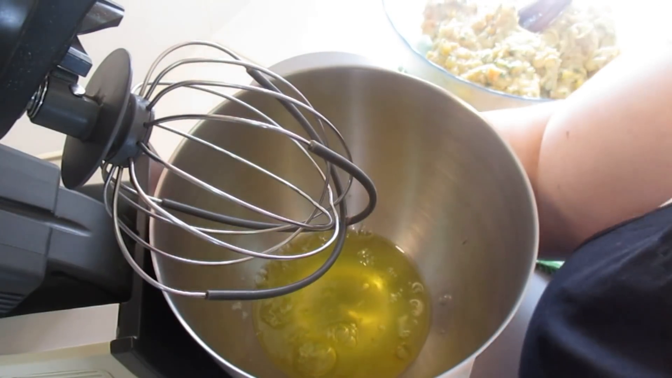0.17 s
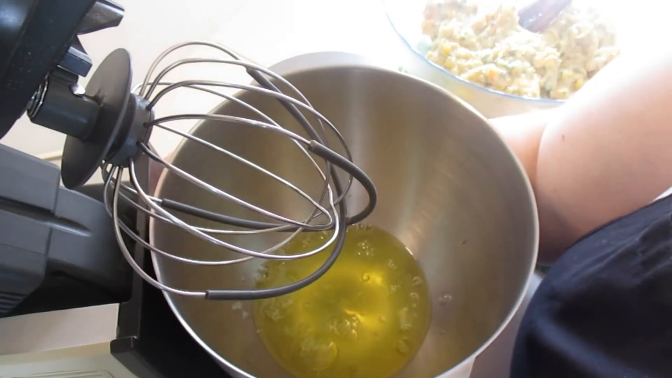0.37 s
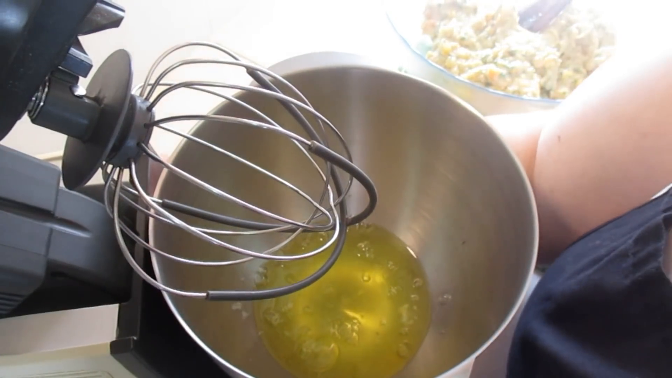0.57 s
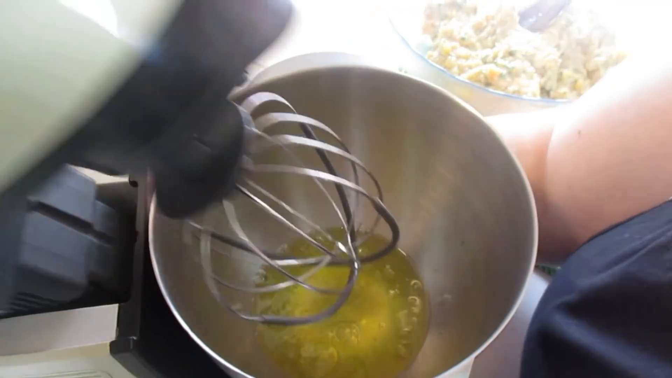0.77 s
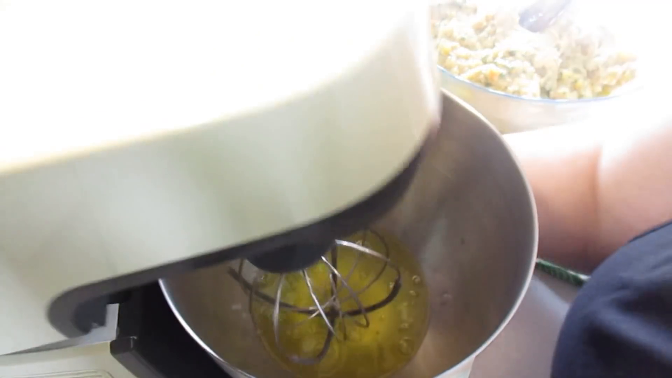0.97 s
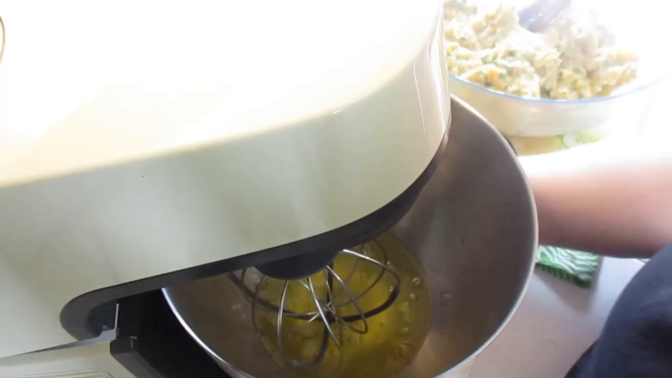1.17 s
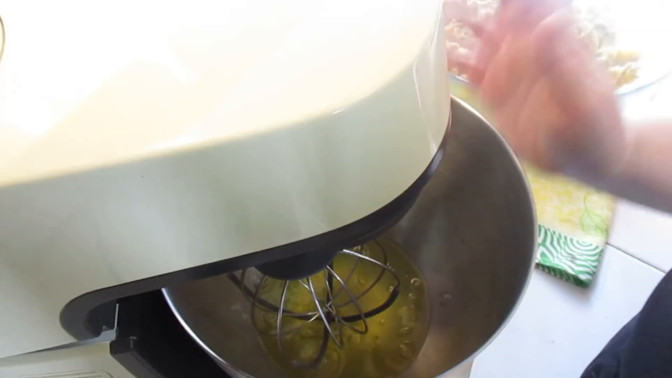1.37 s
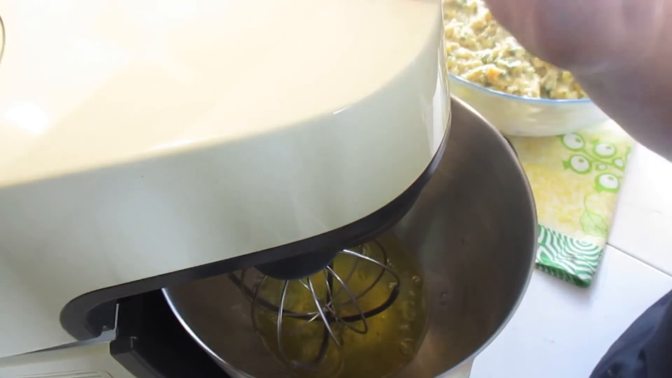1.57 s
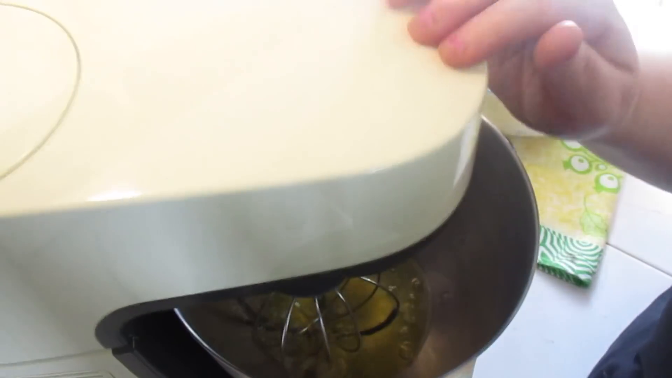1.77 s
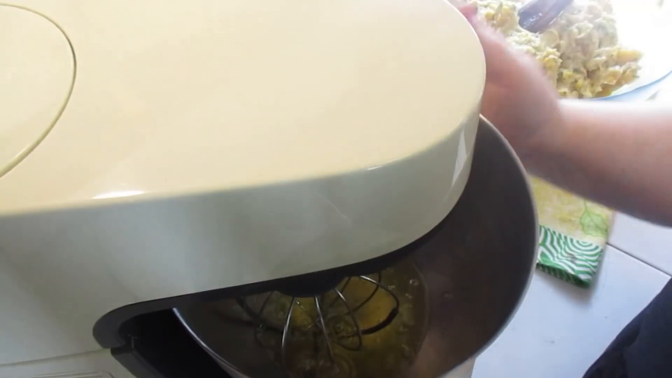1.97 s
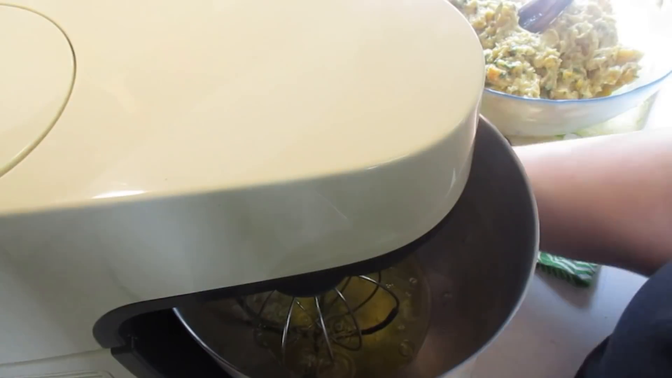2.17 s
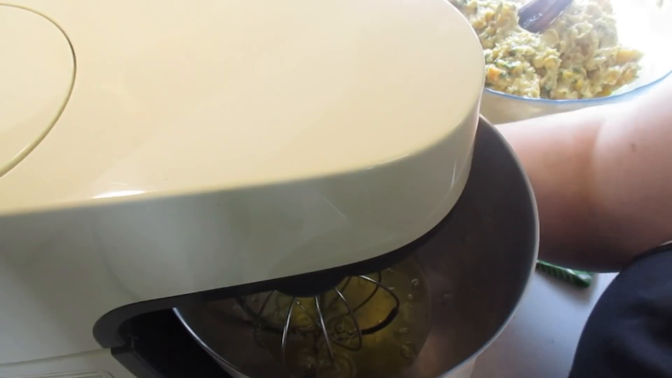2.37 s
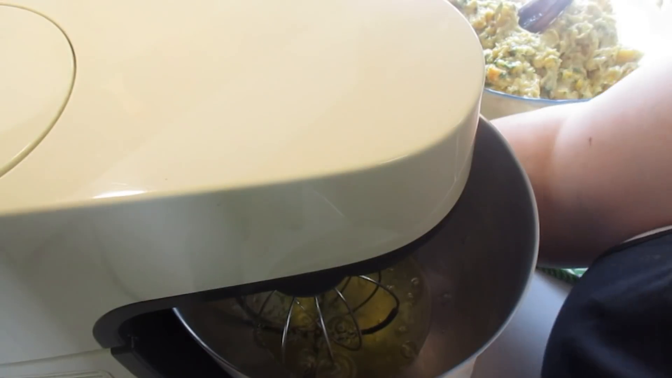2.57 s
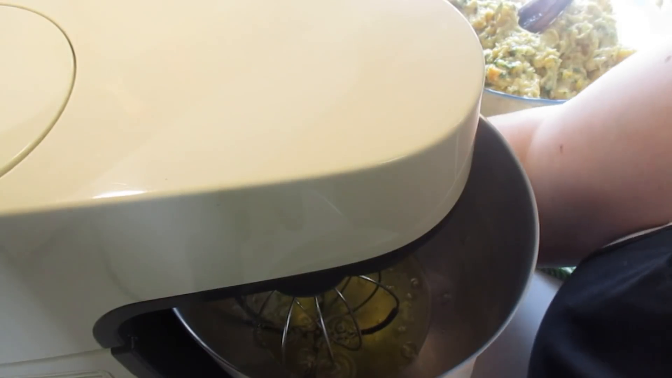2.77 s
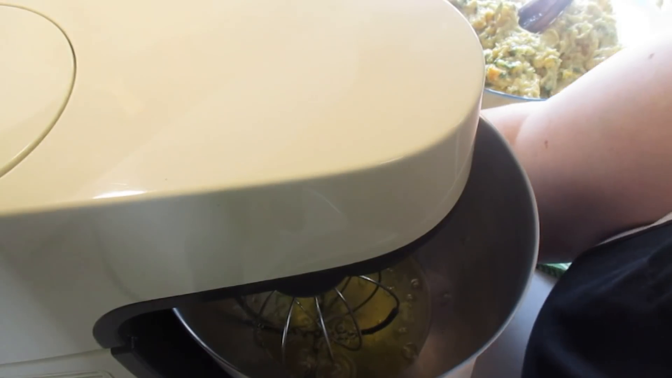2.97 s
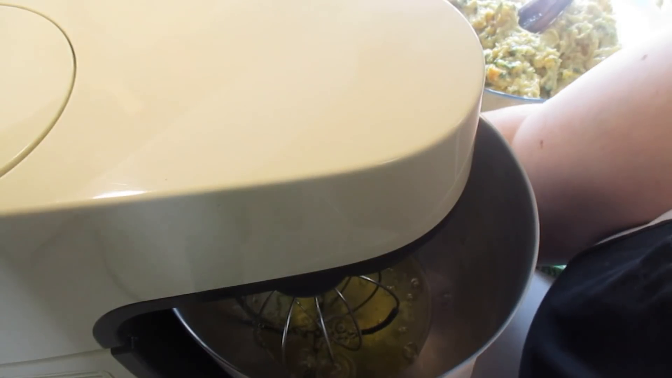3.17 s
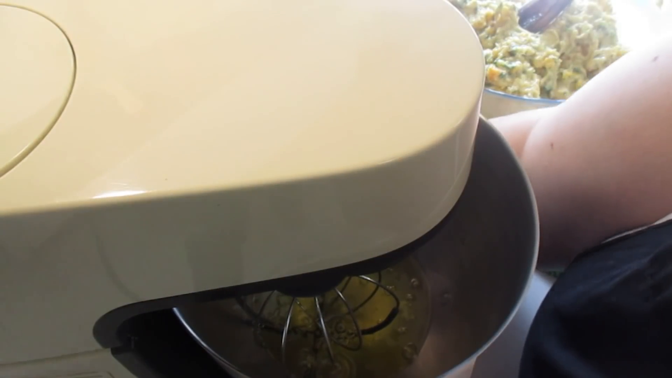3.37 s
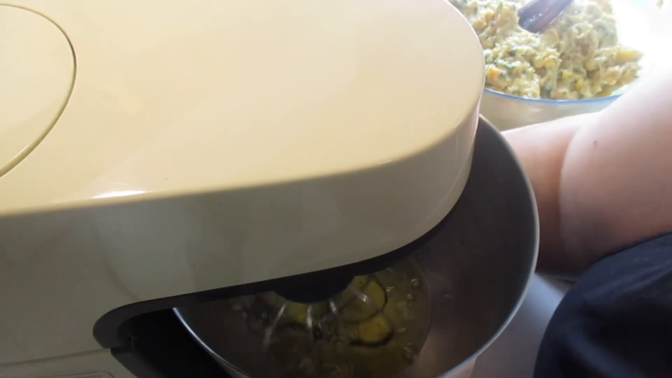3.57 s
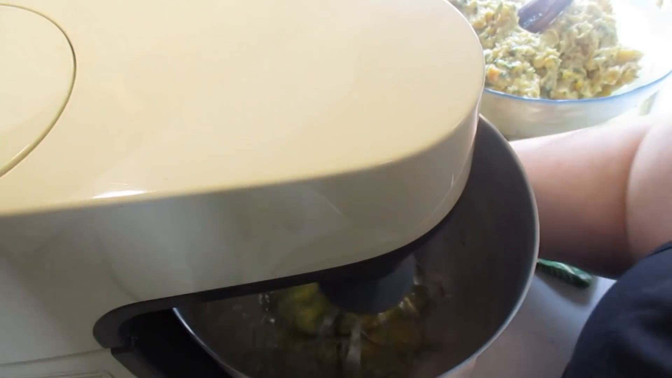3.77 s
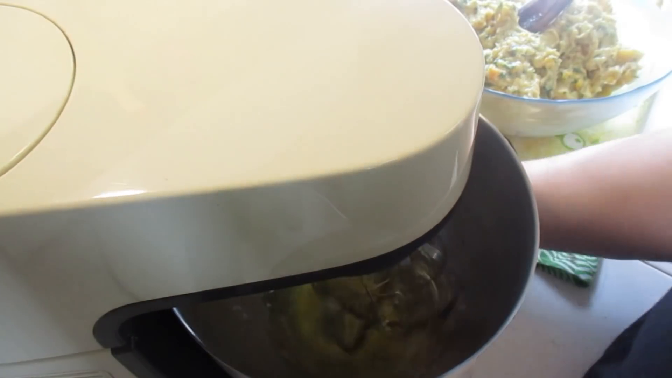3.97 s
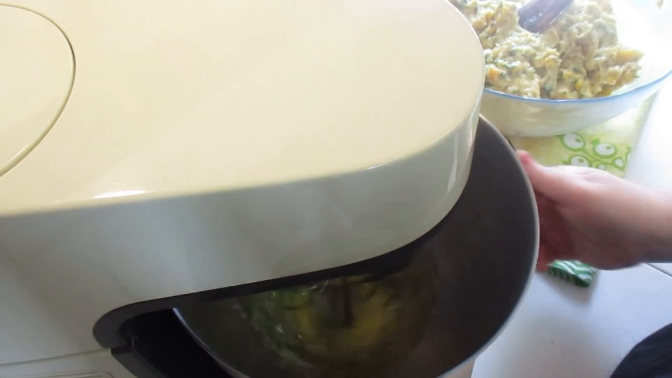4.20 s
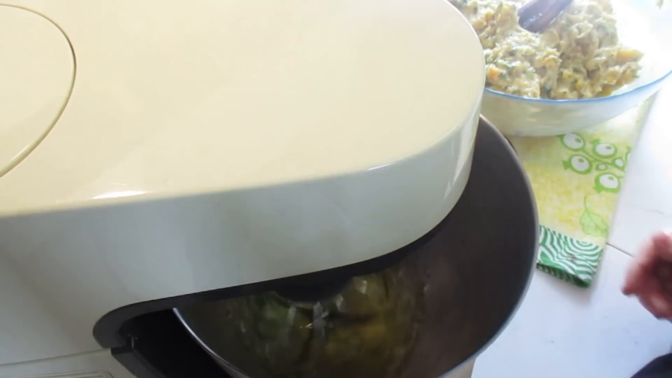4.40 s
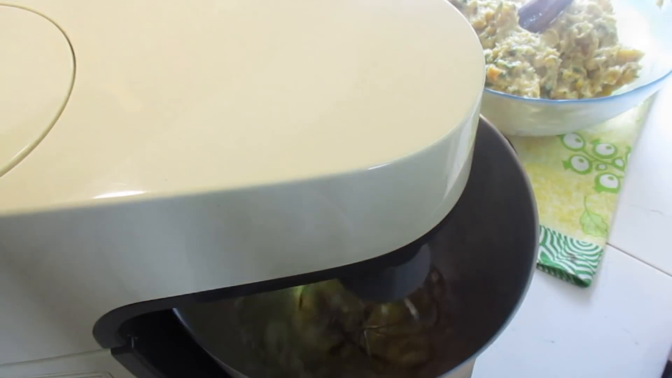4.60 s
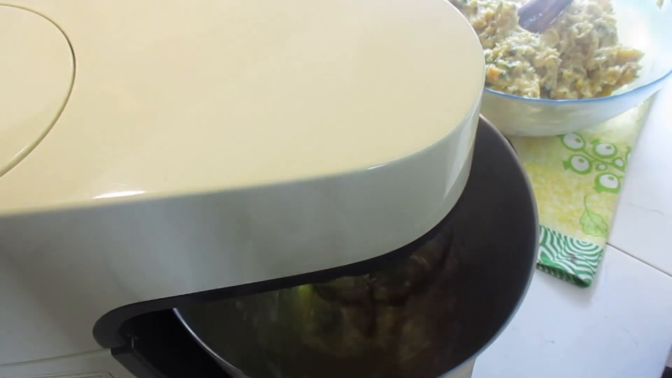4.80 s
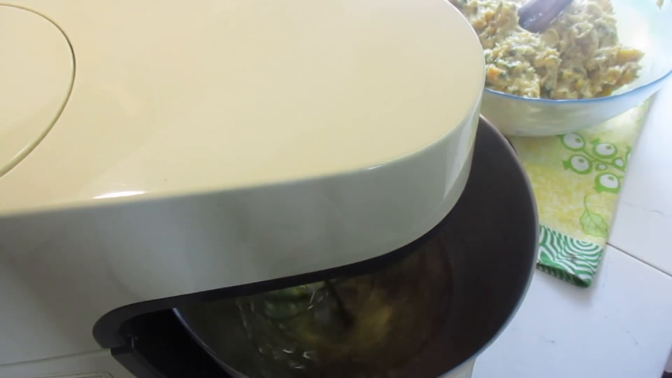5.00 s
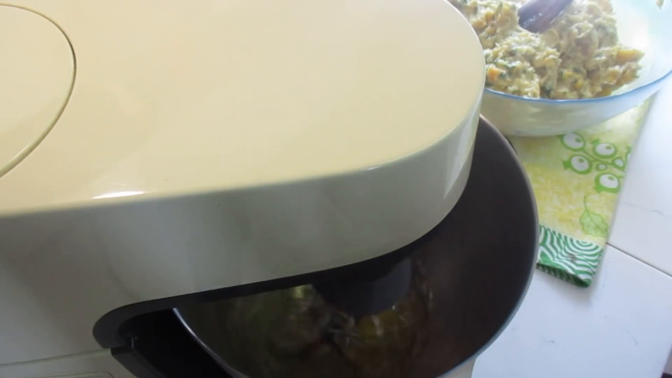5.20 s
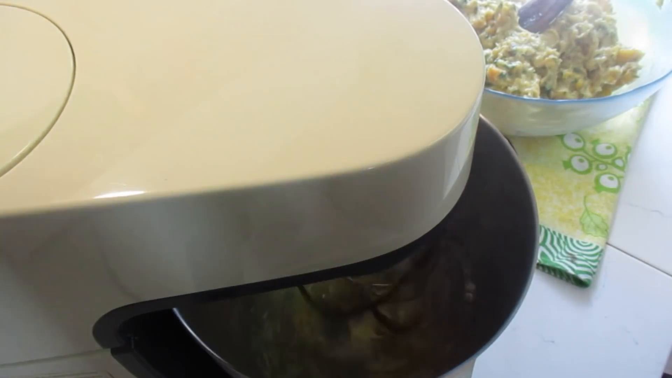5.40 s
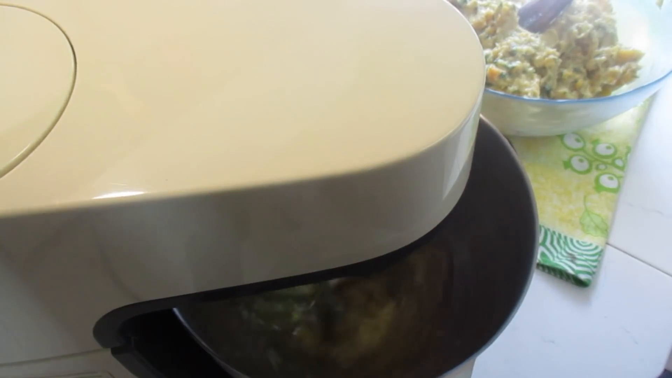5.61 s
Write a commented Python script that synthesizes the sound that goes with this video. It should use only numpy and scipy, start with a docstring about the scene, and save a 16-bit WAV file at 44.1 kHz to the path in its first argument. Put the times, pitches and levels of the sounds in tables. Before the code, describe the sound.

Plastic and metal knocks as a mixer head swings down and locks with a loud clack, then the motor starts and whirs steadily, speeding up.

```python
"""A stand mixer runs close by in a kitchen: gears clatter, the shaft whines, a wire whisk beats eggs in a steel bowl.
Shaft orders, brush buzz and random impacts sound through resonances; the motor speeds up in two steps.
Before that the unlatched head swings down, is pressed home and the speed knob clicks: noise bursts ring the housing.
Room air and faint appliance tones lie behind. Overload ducks the gain, hardest at the loudest clack."""
import sys
import numpy as np
from scipy import signal
from scipy.fft import rfft, irfft, next_fast_len
from scipy.io import wavfile
from scipy.ndimage import uniform_filter1d, minimum_filter1d, map_coordinates

SR = 44100
rng = np.random.default_rng(int(sys.argv[2]) if len(sys.argv) > 2 else 0)


def store_pcm(level_fs):
    """Save levels as 16-bit WAV."""
    pcm = np.round(np.clip(level_fs, -1, 1) * 32767).astype(np.int16)
    wavfile.write(sys.argv[1], SR, np.atleast_2d(pcm).T)


N = 249165
TOP_HZ = 15950  # upper band limit


def amp(db):
    """Decibels to gain."""
    return 10 ** (np.asarray(db) / 20)


def unit(x):
    """x at rms 1."""
    return x / np.sqrt(np.mean(x ** 2) + 1e-20)


def steady(x, span_s):
    """x at an even rms of 1 over each span_s; its fast grain stays."""
    power = np.abs(uniform_filter1d(x ** 2, size=int(span_s * SR) + 1))
    return x / np.sqrt(power + 1e-12)


def along(points, hz):
    """(f/Hz, value) points read on a log axis."""
    f, v = np.transpose(points)
    return np.interp(np.log(hz + 1), np.log(f + 1), v)


def curve(rows):
    """(t/s, value) rows as one value per sample."""
    s, v = np.transpose(rows)
    return np.interp(np.arange(N) / SR, s, v)


def during(start_s, end_s, fade_s):
    """1 from start to end, fading to 0 outside."""
    t = np.arange(N) / SR
    return np.clip(1 + np.minimum(t - start_s, end_s - t) / fade_s, 0, 1)


def settling(start_s, lag_s):
    """0 until start, then approaching 1 with time constant lag_s."""
    return 1 - np.exp(-np.maximum(np.arange(N) / SR - start_s, 0) / lag_s)


def wobble(knots_per_s):
    """Smooth random curve."""
    knots = rng.standard_normal(int(N * knots_per_s / SR) + 4)
    return map_coordinates(knots, [np.arange(N) * knots_per_s / SR])


def coloured(x, gain):
    """x through the causal minimum-phase filter whose gain is the given function of Hz."""
    m = 2 * next_fast_len(len(x) // 2 + 4096)
    log_gain = np.log(np.maximum(gain(np.fft.rfftfreq(m, 1 / SR)), 1e-6))
    cepstrum = irfft(log_gain)
    cepstrum[1:m // 2] *= 2
    cepstrum[m // 2 + 1:] = 0
    return irfft(rfft(x, m) * np.exp(rfft(cepstrum)), m)[:len(x)]


def band(hz, lo_hz, hi_hz, order=4):
    """Gain of a band-pass."""
    low_side = 1 + (lo_hz / (hz + 1)) ** (2 * order)
    high_side = 1 + (hz / hi_hz) ** (2 * order)
    return (low_side * high_side) ** -.5


def resonances(hz, modes):
    """Power gain of a set of (f/Hz, width/Hz, level/dB) resonances."""
    return sum(amp(db) ** 2 / (1 + (2 * (hz - c) / w) ** 2) for c, w, db in modes)


def grains(rate_per_s, spread_db):
    """Tiny impacts of random time and size, at rms 1."""
    hits = rng.random(N) < rate_per_s / SR
    return unit(hits * rng.standard_normal(N) * amp(spread_db * rng.standard_normal(N)))


def churned(x, depth_db):
    """x with ever-changing bands favoured: time-frequency patches of random gain."""
    z = signal.stft(x, nperseg=512)[2]
    field = uniform_filter1d(rng.standard_normal(z.shape), size=5, axis=0)
    field = uniform_filter1d(field, size=9, axis=1)
    return signal.istft(z * amp(depth_db * unit(field)), nperseg=512)[1][:N]


def add(track, s, sound):
    """Mix a sound into the track at s seconds."""
    part = track[max(round(s * SR), 0):][:len(sound)]
    part += sound[:len(part)]


# decay of the kitchen's answer: f/Hz, t60/s
WALL_DECAY = [(100, 0.22), (400, 0.3), (1200, 0.28), (4000, 0.2), (12000, 0.24)]


def room(x, wet_db):
    """x with the kitchen's answer: diffuse noise, each frequency dying at its own speed."""
    hz, t, z = signal.stft(rng.standard_normal(SR // 2), SR, nperseg=256)
    decay = amp(-60 * t / along(WALL_DECAY, hz)[:, None])
    tail = signal.istft(z * decay, SR, nperseg=256)[1]
    tail = np.pad(tail / np.linalg.norm(tail), (SR // 200, 0))  # 5 ms pre-delay
    return x + amp(wet_db) * signal.fftconvolve(x, tail)[:len(x)]


EVEN_S = .09  # span over which drive layers are evened out
START_S, CRUISE_TURNS_PER_S = 3.458, 103.2  # motor start, first setting
# shaft spins up, overshoots, settles, is turned up: t/s, speed/(turns/s)
SHAFT_SPEED = [(3.458, 0), (3.51, 44), (3.58, 71), (3.65, 89), (3.72, 98.2), (3.79, 103.7), (3.86, 106.5),
               (3.93, 108.1), (4.07, 106), (4.22, 103.1), (4.33, 103), (4.42, 103.7), (4.9, 127.4),
               (5.14, 135.8), (5.33, 141.8), (5.5, 148), (5.65, 154.4)]


def shaft_speed():
    """Turns a second; the rotor's inertia rounds off each change."""
    return uniform_filter1d(curve(SHAFT_SPEED), size=2205)


def loudness(speed, load, cruise_db, standstill_db, doubled_db, load_share):
    """Layer gain: swells as the shaft spins up, grows or sinks with more speed, follows a share of a load curve."""
    excess = speed / CRUISE_TURNS_PER_S - 1
    load_db = curve(load) - np.mean(load, axis=0)[1]
    speed_db = doubled_db * np.maximum(excess, 0) - standstill_db * np.minimum(excess, 0)
    return amp(cruise_db + speed_db + load_share * load_db) * settling(START_S, 0.0026)


# running drive to air, spectral slope: f/Hz, relative level/dB
RUNNING_SPECTRUM = [(24, -57), (40, -25.5), (106, -14), (163, -7.5), (344, -1.5), (442, 6), (489, 3.5),
                    (712, -0.5), (1230, -9.5), (2310, -19), (2550, -19), (3810, -21.5), (7300, -24.5),
                    (10100, -28.5), (15900, -47)]
# resonances and hollows of machine with bowl, before ring_share: f/Hz, width/Hz, level/dB
BODY_MODES = [(104, 34, 11), (131.4, 17, 11), (165, 30, -9), (249, 73, 6.5), (314.5, 28, 7.5),
              (353, 15, 10.5), (440.2, 39, -15), (503.5, 45, 4.5), (722.5, 29, -12.5), (921, 41, 6.5),
              (1225, 100, 6.5), (1637, 47, 5.5), (2200, 20, 2.5), (2295, 440, -3.5), (2597, 70, 6),
              (3074, 68, 7.5), (3680, 320, -4.5), (5310, 74, 8), (9900, 240, 3), (11540, 210, 4),
              (13020, 670, 8)]


def machine(hz, ring_share=1.0):
    """Gain from running drive to air; ring_share scales the resonances and hollows."""
    ring_db = sum(db / (1 + (2 * (hz - c) / w) ** 4) for c, w, db in BODY_MODES)
    return amp(along(RUNNING_SPECTRUM, hz) + ring_share * ring_db)


def through_machine(x, lo_hz, hi_hz, ring_share):
    """One band of x through the machine's body, evened out."""
    gain = lambda hz: machine(hz, ring_share) * band(hz, lo_hz, hi_hz, order=6)
    return steady(coloured(x, gain), EVEN_S)


# drive labouring, relative to its mean: t/s, level/dB
DRIVE_LOAD = [(3.7, -12), (3.78, -17), (3.89, -14.5), (4.0, -11), (4.11, -14.5), (4.27, -12.5),
              (4.35, -16.5), (4.5, -16), (4.68, -14.5), (4.75, -10), (4.85, -10.5), (4.98, -13),
              (5.05, -14.5), (5.1, -18.5), (5.24, -18.5), (5.38, -11), (5.48, -10.5), (5.55, -9),
              (5.65, -13.5)]
# low roar, relative to its mean: t/s, level/dB
ROAR_LEVEL = [(3.5, -21), (3.59, -18), (3.7, -18.5), (3.78, -22), (3.87, -20.5), (4.02, -12), (4.08, -19),
              (4.27, -16.5), (4.36, -18.5), (4.5, -18.5), (4.59, -17.5), (4.67, -15.5), (4.75, -13),
              (4.87, -16.5), (4.94, -10), (5.02, -12.5), (5.09, -19), (5.23, -20), (5.36, -14.5),
              (5.47, -15), (5.56, -10), (5.65, -15.5)]
# slower drive shaft: order/multiple of rotation, relative level/dB
BELT_ORDERS = [(1, 5), (2, 6), (3, 6), (4, -0.5), (5, 5)]
# gear mesh among the clatter: t/s, level/dB
MESH_LEVEL_DB = [(3.6, -18), (3.85, -3), (4.05, -7.5), (4.28, -6.5), (4.5, -0.5), (4.8, -6.5), (5.0, -15),
                 (5.17, -5.5), (5.65, -17)]


def mixer(drone_db=-1.0, belt_db=-6.0, clatter_db=-0.5, hiss_db=-3, brush_db=-7, swing=0.057, flutter=0.07):
    """Drive tones and gear impacts sound through the machine's body; the wires slap through the eggs."""
    speed = np.maximum(shaft_speed(), 1) * (1 + 0.0009 * wobble(40))
    drone = loudness(speed, ROAR_LEVEL, cruise_db=-19.0, standstill_db=-5.5, doubled_db=-3.5, load_share=0.78)
    clatter = loudness(speed, DRIVE_LOAD, cruise_db=-19.0, standstill_db=-23.5, doubled_db=-2.5, load_share=0.93)
    hiss = loudness(speed, DRIVE_LOAD, cruise_db=-26.0, standstill_db=-38, doubled_db=2.5, load_share=0.77)
    motor = loudness(speed, DRIVE_LOAD, cruise_db=-32, standstill_db=-24, doubled_db=9, load_share=0.3)
    turns = np.cumsum(speed) / SR
    belt_turns = .912 * turns
    # wires pass through the liquid in a fast flutter
    beating = 1 + flutter * np.sin(2 * np.pi * 0.19 * turns)
    splashes = churned(grains(9000, 2.5) * beating * amp(1.1 * wobble(30)), depth_db=2)
    # teeth strike harder once a turn of the slower shaft
    harder = 1 + swing * np.sin(2 * np.pi * belt_turns)
    teeth = churned(grains(3500, 2.16) * harder * amp(0.9 * wobble(45)), depth_db=2.0)
    brushes = room(commutator(turns), wet_db=-7)
    mesh = steady(room(gear_mesh(turns), wet_db=-18), EVEN_S)
    belt_tones = shaft_tones(belt_turns, BELT_ORDERS, waver_db=2.0) * amp(2.3 * wobble(55))
    belt = through_machine(belt_tones, 50, 1050, 1.0)
    low = amp(drone_db) * through_machine(teeth, 27, 619, 0.83) + amp(belt_db) * belt
    middle = amp(clatter_db) * through_machine(teeth * beating, 734, 2740, 0.77)
    middle += amp(curve(MESH_LEVEL_DB)) * mesh
    high = amp(hiss_db) * through_machine(splashes, 2120, TOP_HZ, 1.0)
    buzz = amp(brush_db) * through_machine(brushes, 3430, 12600, 0.73)
    layers = drone * low + clatter * middle + hiss * high + motor * buzz
    return layers + whine(speed, turns) + run_up(turns)


def shaft_tones(turns, orders, waver_db):
    """Whole multiples of a shaft's rotation, each wavering in strength."""
    tone = lambda k: np.sin(2 * np.pi * (round(k) * turns + rng.random()))
    return sum(amp(db + waver_db * wobble(9.7)) * tone(k) for k, db in orders)


def commutator(turns, count=150, size=8192):
    """Brushes scrape over the same uneven surface every turn; its middle-sized bumps are the deepest."""
    order = np.arange(count)
    depth = np.sqrt(np.sin(np.pi * order / count))
    surface = irfft(depth * np.exp(2j * np.pi * rng.random(count)), size)
    return unit(np.interp(turns % 1, np.arange(size) / size, surface))


# gear mesh and its sidebands: order/multiple of shaft rotation, relative level/dB
MESH_ORDERS = [(9, 13), (11.5, 11.5), (12, 11.5), (13, 11.5), (13.8, 5.5)]


def gear_mesh(turns, slop_rad=0.5, rough_db=3):
    """Loose teeth smear the mesh tones into rough bands that climb with the speed."""
    tone = lambda k: np.sin(2 * np.pi * k * turns + slop_rad * wobble(70))
    return sum(amp(db + rough_db * wobble(60)) * tone(k) for k, db in MESH_ORDERS)


# strong orders, from commutator and fan: order/multiple of shaft rotation, relative level/dB
WHINE_ORDERS = [(24, 0), (30, -2), (36, 3), (42, -1), (48, 0), (54, 0), (60, 0), (66, -3), (72, -2),
                (84, -2), (96, -4), (108, -1), (114, -6), (120, -8), (144, -7)]
# their sidebands: order/multiple of shaft rotation, relative level/dB
SIDEBAND_ORDERS = [(47, -3), (59, -3), (65, -4), (70, -4), (77, 1), (78, -2), (83, -1), (89, -1), (93, -2),
                   (101, -2), (107, -3), (113, -3), (121, -3), (122, -3)]
# motor casing radiating the whine: f/Hz, relative level/dB
CASING_GAIN = [(2000, -46), (3000, -42), (3700, -49), (4400, -44), (5000, -46), (5350, -45), (5800, -51),
               (6350, -44), (6750, -37), (7050, -43), (7380, -39), (7900, -48), (8700, -45), (9300, -52),
               (9900, -44), (10800, -56), (11500, -50), (12000, -61), (12600, -55), (14000, -65),
               (15300, -61), (16000, -66)]


def whine(speed, turns, faster_db=13, sideband_db=-2):
    """Shaft orders sing once up to speed; faster, main orders grow, sidebands sink; echoes make the glide waver."""
    singing = np.clip((speed - 92) / 12, 0, 1)
    excess = np.clip(speed / CRUISE_TURNS_PER_S - 1, 0, .25)
    main = amp(faster_db * excess) * shaft_tones(turns, WHINE_ORDERS, waver_db=2.5)
    sides = amp(sideband_db - faster_db * excess) * shaft_tones(turns, SIDEBAND_ORDERS, waver_db=2.5)
    tones = room(singing * (main + sides), wet_db=-2)
    return coloured(tones, lambda hz: amp(along(CASING_GAIN, hz) - 1))


# gear tones while the motor runs up: t/s, level/dB
RUN_UP_LEVEL_DB = [(3.56, -36), (3.62, -31), (3.68, -21.5), (3.74, -19.5), (3.78, -28), (3.9, -35)]
# order/multiple of shaft rotation, relative level/dB
RUN_UP_TONES = [(9, -2), (11.5, -9), (12, 0), (13, -6), (19.5, -16), (22.5, -11), (24, -15), (26, -16)]
# gearbox resonances: f/Hz, width/Hz, relative level/dB
GEARBOX_MODES = [(1120, 130, 0), (1270, 160, -3), (1770, 90, -4), (2210, 83, 4), (2750, 120, 0)]


def run_up(turns):
    """Acceleration presses the gear teeth together: a rough rising note through the gearbox's resonances."""
    tone = lambda k: np.sin(2 * np.pi * k * turns + .9 * wobble(130))
    tones = sum(amp(db + 4 * wobble(110)) * tone(k) for k, db in RUN_UP_TONES)
    tones = coloured(tones, lambda hz: np.sqrt(resonances(hz, GEARBOX_MODES)))
    gate = during(RUN_UP_LEVEL_DB[0][0], RUN_UP_LEVEL_DB[-1][0], 0.0091)
    return amp(curve(RUN_UP_LEVEL_DB)) * gate * steady(tones, EVEN_S)


# jolts of the starting drive: t/s, peak level before room/dB
DRIVE_JOLTS = [(3.459, -11), (3.54, -23)]


def motor_kick(ring_hz=520, t60_s=0.13, rise_s=0.004, spread=1.17):
    """Starting torque jolts the drive; it rings at its main resonance."""
    out, t = np.zeros(N), np.arange(SR // 4) / SR
    envelope = amp(-60 * t / t60_s) * (1 - np.exp(-t / rise_s)) ** 2
    gain = lambda hz: band(hz, ring_hz / spread, ring_hz * spread, order=8)
    for s, db in DRIVE_JOLTS:
        jolt = steady(coloured(rng.standard_normal(len(t)), gain), 0.019) * envelope
        add(out, s, amp(db) * room(jolt / np.abs(jolt).max(), wet_db=-12))
    return out


# resonances of the struck housing: f/Hz, width/Hz, relative level/dB
HOUSING_MODES = [(261, 56, -2.5), (311, 19, 5.5), (385, 79, -3.5), (626, 33, -1.5), (800, 320, -5),
                 (945, 310, -20.5), (1120, 74, -4.5), (1210, 41, -8), (1360, 40, -17.5), (1520, 37, -11.5),
                 (1820, 250, -13.5), (1940, 46, -12), (2500, 480, -17.5), (2950, 210, -16),
                 (3600, 350, -21.5), (4530, 120, -16.5), (5780, 160, -18.5)]


def housing(hz, between_db=-15, corner_hz=1500):
    """Gain of the struck housing: resonances above a falling base."""
    base = amp(between_db) ** 2 / (1 + (hz / corner_hz) ** 2)
    return np.sqrt(resonances(hz, HOUSING_MODES) + base)


LEAD_IN_S = .02  # room for the scrape ahead of each blow


def blow(lo_hz, hi_hz, spot_hz, spot_db, chatter_s, rise_s, lead_db=-32, lead_s=0.0058, spot_octaves=0.21):
    """One band of a blow, rms 1 over 20 ms: parts scrape just before they meet, chatter, ring the housing."""
    t = np.arange(SR // 2) / SR - LEAD_IN_S
    after = np.maximum(t, 0)
    scrape = amp(lead_db) * np.exp(np.minimum(t, 0) / lead_s)
    force = amp(-60 * after / chatter_s) * (1 - np.exp(-after / rise_s) + scrape)
    spot = lambda hz: amp(spot_db / (1 + (np.log2((hz + 1) / spot_hz) / spot_octaves) ** 2))
    gain = lambda hz: housing(hz) * spot(hz) * band(hz, lo_hz, hi_hz, order=3)
    ring = coloured(rng.standard_normal(len(t)) * force, gain)
    return ring / np.sqrt(np.sum(ring ** 2) / (SR // 50))


# blows on latch, head and knob, then clunks of the starting drive: t/s, level/dB,
# thud and click before trims/dB, favoured f/Hz, its boost/dB, ring upper edge f/Hz,
# contact time before band scaling/s
BLOWS = [(0.203, -18.5, -16, -8, 1440, 14, 1660, 0.0015),
         (0.452, -26, -1.5, -12.5, 1100, 6.7, 2000, 0.0043),
         (0.483, -32.5, -3, -25, 1150, 5.1, 1390, 0.0072), (0.563, -18.5, -3, -8.5, 316, 3.8, 3400, 0.0045),
         (0.581, -7.5, -5.5, -16.5, 1310, 4, 2350, 0.0027), (0.652, -38.5, -8, 5.5, 640, 5, 2600, .003),
         (0.66, -23, -10, -23, 1250, 9.1, 1500, 0.0051), (0.689, -29, 4.5, -17, 400, 13, 1500, 0.0028),
         (0.729, -17.5, -3, -19, 1490, 6.6, 1920, 0.0058), (0.74, -13.5, -10, -19.5, 625, 25, 1500, 0.0012),
         (0.741, -14, -19, -24, 1350, 12, 1680, 0.00097), (0.807, -37, 4, -23, 400, 8, 1400, 0.002),
         (0.934, -30.5, 6.5, -26, 304, 18, 1800, 0.0068), (1.091, -38, 8, -13, 900, 3.4, 3200, 0.019),
         (1.123, -27.5, 3, -28, 400, 2.8, 1790, 0.0052), (1.149, -28, -0.5, -27, 630, 14, 1800, 0.0036),
         (1.222, -42, -7, -11, 2390, 8.9, 3000, 0.0016), (1.585, -37, 5.5, 1, 307, 5.5, 2600, 0.0018),
         (1.606, -30.5, -1.5, -26, 1090, 6.4, 1500, 0.0063),
         (1.639, -23, -5.5, -10, 1100, 3.2, 3500, 0.0048), (1.646, -7, -9, -16.5, 940, 6.5, 2300, 0.00039),
         (1.664, -29, 2, -21, 1250, 8.3, 1516, 0.0051), (1.69, -34, 9, -17.5, 400, 7, 1396, 0.0013),
         (1.7205, -20, -3, 0, 1400, 3, 2960, 0.00075), (1.724, -12.5, 2, -16, 327, 2.9, 1490, 0.00041),
         (1.739, -12, -4, -11.5, 1250, 7, 1707, .008), (1.757, 3.5, -4, -8, 1420, 6.9, 3000, 0.0017),
         (1.763, 4, -10.5, -15.5, 1000, 6.9, 1900, 0.0013), (2.614, -51.5, 11, 6, 324, 8.6, 3530, 0.0051),
         (2.72, -56, 8, 5, 320, 9.7, 3500, .004), (2.803, -43, 7.5, 0, 320, 6.3, 3000, 0.0014),
         (2.851, -30, 7, 2, 220, 5, 3000, 0.0061), (2.883, -26, 2.5, -3, 400, 3.5, 2980, 0.0059),
         (2.942, -41.5, 5.5, 5.5, 320, 7, 2600, 0.0026), (2.996, -33, 13, 5, 240, 6, 3000, 0.0032),
         (3.035, -20.5, 1, -4, 2170, 3.3, 3500, 0.0018), (3.043, -12, 3.5, -14, 320, 10, 2270, 0.0013),
         (3.18, -38, -4, -14, 1690, 7.5, 3000, 0.0078), (3.211, -33.5, 1.5, -8.5, 400, 4, 3400, 0.0081),
         (3.457, -17.5, -2.5, -10, 526, 14, 1990, 0.0067), (3.504, -21, -2, -10, 1170, 15, 2000, .003),
         (3.578, -24, -2, -5, 620, 5.7, 2000, .002), (3.591, -18, 2.5, -8, 795, 5.8, 2000, 0.0019)]


def knocks(thud_db=-5, ring_db=-8.5, click_db=-10.0, drag=6.0):
    """Each blow has its own share of thud, ring and click; a slow contact drags on into a scrape."""
    out = np.zeros(N)
    for s, db, thud, click, spot_hz, spot_db, top_hz, rise_s in BLOWS:
        drag_s = drag * rise_s
        hit = amp(ring_db) * blow(547, top_hz, spot_hz, spot_db, 0.023 + drag_s, rise_s)
        hit += amp(thud_db + thud) * blow(160, 440, spot_hz, spot_db, 0.037 + drag_s, 1.1 * rise_s)
        hit += amp(click_db + click) * blow(2010, 10000, spot_hz, spot_db, 0.049 + drag_s, 0.44 * rise_s)
        add(out, s - LEAD_IN_S, amp(db) * room(hit, wet_db=-8.0))
    return out


LATCH_S, LATCH_PEAK_DB = 1.732, -10.5
# steel latch: f/Hz, width/Hz, relative level/dB
STEEL_MODES = [(2509, 130, 0), (3946, 130, -11.5), (5940, 150, -7), (6500, 170, -3), (6934, 200, -5.5),
               (7800, 300, -11.5)]


def latch(scrape_s=0.0031):
    """The steel latch slides over its catch for a few milliseconds and rings brightly."""
    t = np.arange(SR // 4) / SR
    force = rng.standard_normal(len(t)) * np.exp(-(t / scrape_s - 1) ** 2)
    ring = room(coloured(force, lambda hz: np.sqrt(resonances(hz, STEEL_MODES))), wet_db=-7.5)
    out = np.zeros(N)
    add(out, LATCH_S, amp(LATCH_PEAK_DB) * ring / np.abs(ring).max())
    return out


# speed knob's notches: t/s, peak level/dB
KNOB_NOTCHES = [(2.852, -26), (2.886, -23.5), (2.997, -28), (3.037, -26)]


def detents(t60_s=0.016, ring_hz=11000, ring_width_hz=900, ring_db=6):
    """The knob's spring snaps into each notch with a short, bright tick."""
    out, t = np.zeros(N), np.arange(SR // 4) / SR
    ring = lambda hz: np.sqrt(4 + resonances(hz, [(ring_hz, ring_width_hz, ring_db)]))
    spring = lambda hz: band(hz, 3800, 10500, order=4) * ring(hz)
    for s, db in KNOB_NOTCHES:
        tick = room(coloured(rng.standard_normal(len(t)) * amp(-60 * t / t60_s), spring), wet_db=-9)
        add(out, s, amp(db) * tick / np.abs(tick).max())
    return out


# soft jolts of the table: t/s, peak level before trim/dB
TABLE_BUMPS = [(0.509, -31), (0.588, -24.5), (1.206, -23.5), (1.262, -39), (1.78, -13), (2.47, -35),
               (3.098, -33), (3.824, -28)]


def bumps(trim_db=-3, low_hz=35, high_hz=95):
    """The table thumps briefly under shifting weight: short low noise bursts."""
    out, t = np.zeros(N), np.arange(SR // 2) / SR
    fade = amp(-60 * t / .2) * (1 - np.exp(-t / .006))
    for s, db in TABLE_BUMPS:
        thump = coloured(rng.standard_normal(len(t)) * fade, lambda hz: band(hz, low_hz, high_hz, order=3))
        add(out, s - .01, amp(db + trim_db) * thump / np.abs(thump).max())
    return out


# head swing: fastest moment, time to get there, decay of the rubbing
SWING_S, SWING_RISE_S, SWING_FADE_DB_PER_S = 0.86, 0.22, 36
GRIP_S = (0.56, 2)  # hands on the head, from and to
SLIPS_PER_S = 70  # median hinge slip rate


def handling(hinge_db=-36, slip_db=-39, sleeve_db=-59, resting_db=-61, rumble_db=-50, grip_db=7):
    """The hinge rubs and slips in small jerks; a sleeve brushes along; the bowl rumbles under the hand."""
    rub = coloured(grains(1600, 2.3), lambda hz: housing(hz) * band(hz, 190, 1300, order=2))
    rub = unit(room(rub, wet_db=-0.5))
    slip_count = np.floor(np.cumsum(SLIPS_PER_S * np.exp(.5 * wobble(40))) / SR)
    jerks = np.diff(slip_count, prepend=0) * amp(2 * wobble(60))
    ringing = lambda hz: np.sqrt(resonances(hz, HOUSING_MODES)) * band(hz, 260, 1050, order=2)
    slips = unit(room(coloured(jerks, ringing), wet_db=-9.5))
    cloth = unit(coloured(grains(6000, 0.83), lambda hz: band(hz, 1700, 8250, order=3)))
    rumble = unit(coloured(rng.standard_normal(N), lambda hz: band(hz, 90, 95, order=3)))
    since = np.arange(N) / SR - SWING_S
    swing = np.clip(1 + since / SWING_RISE_S, 0, 1) * amp(-SWING_FADE_DB_PER_S * np.maximum(since, 0))
    hinge = swing * (amp(hinge_db + 1.4 * wobble(35)) * rub + amp(slip_db) * slips)
    brushing_db = resting_db + (sleeve_db - resting_db) * during(0, GRIP_S[1], 0.05)
    brushing = amp(brushing_db + 0.81 * wobble(5.7))
    shifting = amp(rumble_db + grip_db * during(*GRIP_S, 0.21) + 0.77 * wobble(22.0))
    return hinge + during(0, START_S, 0.22) * (brushing * cloth + shifting * rumble)


# sleeve sweeping past: t/s, half-width/s, level/dB, centre f/Hz
SLEEVE_SWEEPS = [(0.05, 0.084, -59.5, 7500), (0.35, 0.057, -58, 8000), (0.795, 0.064, -51.5, 7300),
                 (1.17, 0.04, -55.5, 5900), (1.24, 0.07, -57, 8400), (1.53, 0.052, -58, 7480)]


def swishes(spread=0.76):
    """Each sweep of the sleeve is a soft puff of grains in its own treble band."""
    t = np.arange(N) / SR
    out = np.zeros(N)
    for s, width_s, db, centre_hz in SLEEVE_SWEEPS:
        gain = lambda hz: band(hz, centre_hz / spread, centre_hz * spread, order=3)
        puff = unit(coloured(grains(6000, 2), gain))
        out += amp(db) * np.exp(-((t - s) / width_s) ** 2) * puff
    return out


# room air: f/Hz, relative level/dB per Hz
AIR_SPECTRUM = [(13, -26.5), (22, -28), (66, -19.5), (109, -14.5), (178, -22), (210, -9), (386, -7.5),
                (537, -12.5), (583, -9), (2010, -21), (2960, -25.5), (7760, -37.5), (15900, -48)]
# appliance tones: f/Hz, level/dB
APPLIANCE_TONES = [(97, -59), (269, -65), (576, -68), (1351, -69), (2207, -77), (11795, -71)]


def kitchen(air_db=-49, hum_db=0):
    """Shaped-noise room air with faint, wavering appliance tones."""
    t = np.arange(N) / SR
    air = unit(coloured(rng.standard_normal(N), lambda hz: amp(along(AIR_SPECTRUM, hz))))
    tone = lambda hz: np.sin(2 * np.pi * hz * t + 0.55 * wobble(15))
    hum = sum(amp(db + 1.2 * wobble(4.0)) * tone(hz) for hz, db in APPLIANCE_TONES)
    return amp(air_db + 2.4 * wobble(3.2)) * air + amp(hum_db) * hum


def scene():
    """Everything reaches one microphone; both channels are equal."""
    mono = mixer() + motor_kick() + knocks() + latch() + detents()
    mono += bumps() + handling() + swishes() + kitchen()
    return np.array([mono, mono])


def record(dry, threshold_db=-7.0, recovery_db_per_s=14, hold_s=0.15, attack_s=0.0029):
    """Overload pulls the gain down; it holds, then recovers; peaks clip and the band is limited."""
    t = np.arange(N) / SR
    power = np.abs(uniform_filter1d(dry[0] ** 2, size=176))  # 4 ms window
    hold = max(int(hold_s * SR), 1)
    headroom_db = np.minimum(threshold_db - 10 * np.log10(power + 1e-12), 0)
    over_db = -minimum_filter1d(headroom_db, hold, origin=(hold - 1) // 2)
    duck_db = np.maximum.accumulate(over_db + recovery_db_per_s * t) - recovery_db_per_s * t
    lag = np.exp(-1 / (attack_s * SR))
    duck_db = signal.lfilter([1 - lag], [1, -lag], duck_db)
    wet = np.clip(dry * amp(-duck_db), -1, 1)
    return irfft(rfft(wet) * (np.fft.rfftfreq(N, 1 / SR) < TOP_HZ), N)


dry = scene()
out = record(dry)
store_pcm(out)
```